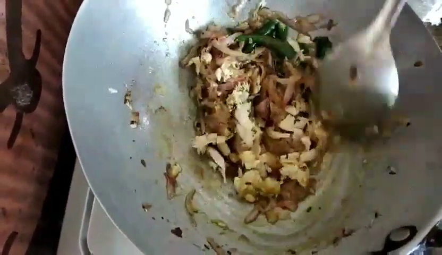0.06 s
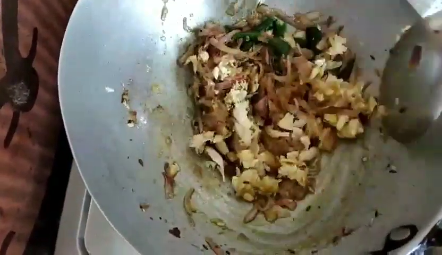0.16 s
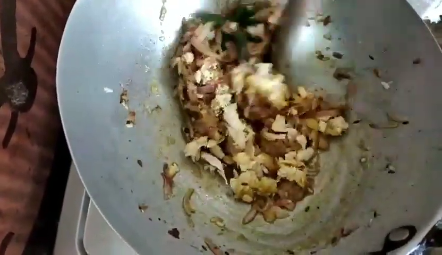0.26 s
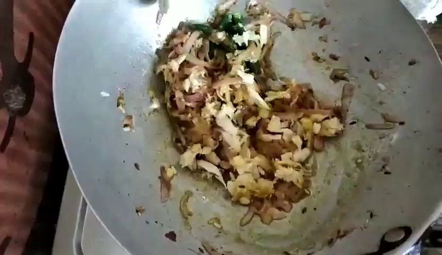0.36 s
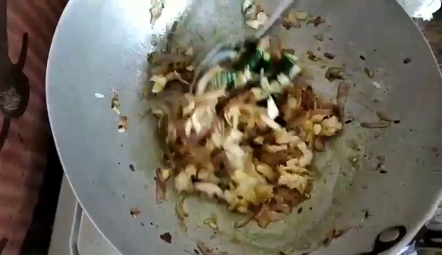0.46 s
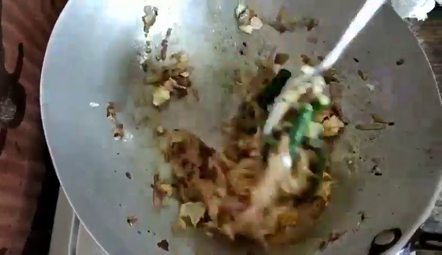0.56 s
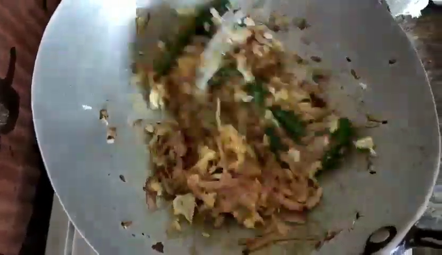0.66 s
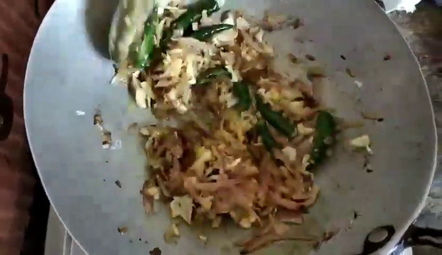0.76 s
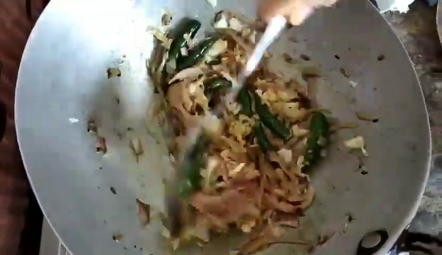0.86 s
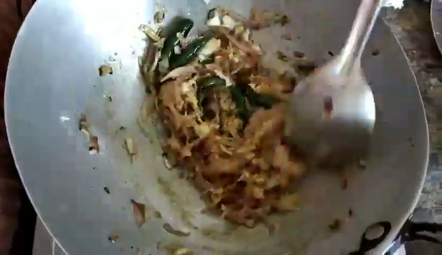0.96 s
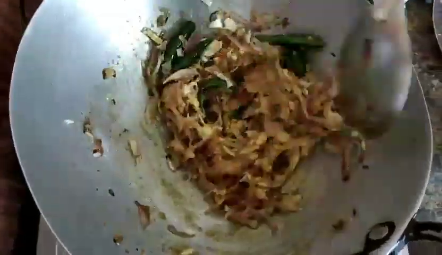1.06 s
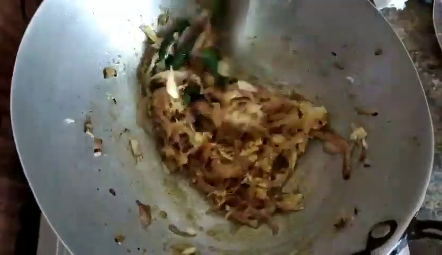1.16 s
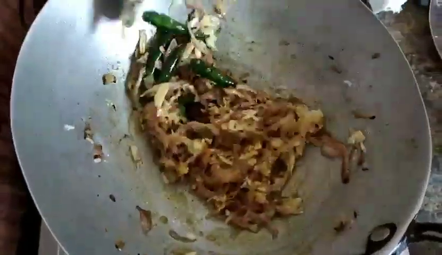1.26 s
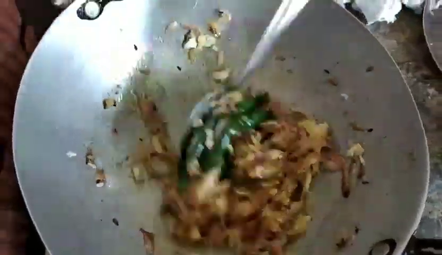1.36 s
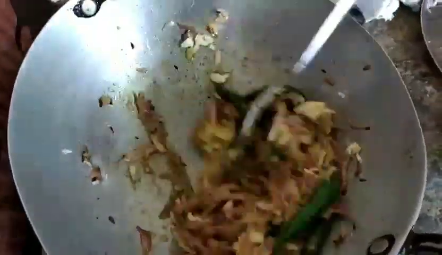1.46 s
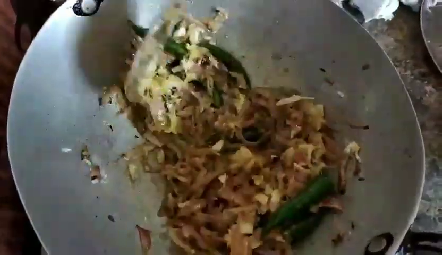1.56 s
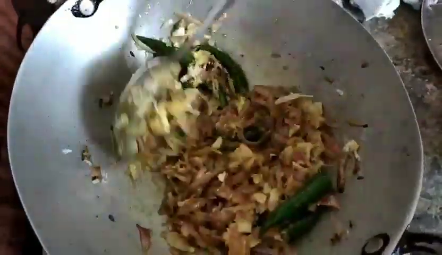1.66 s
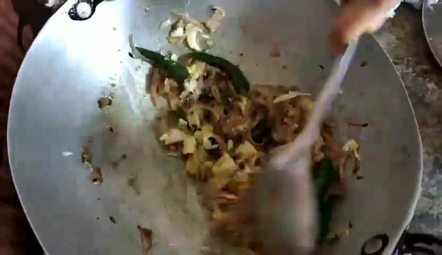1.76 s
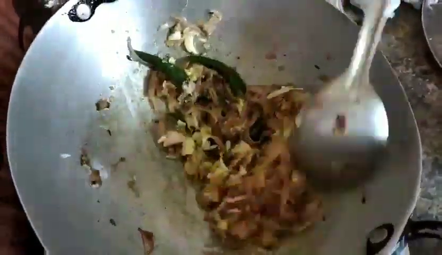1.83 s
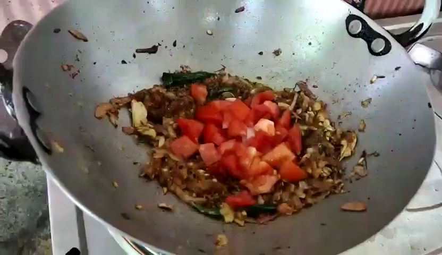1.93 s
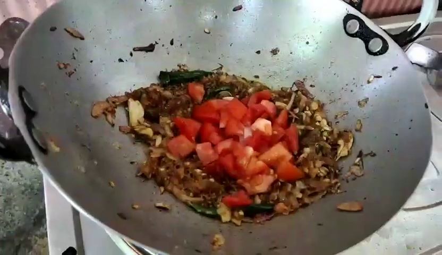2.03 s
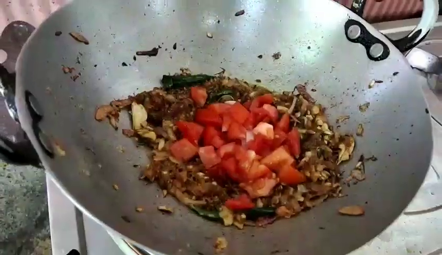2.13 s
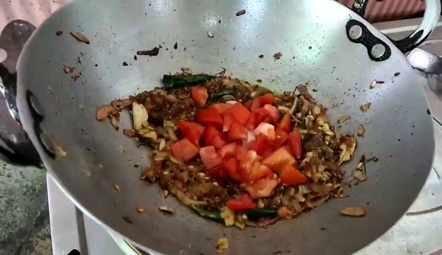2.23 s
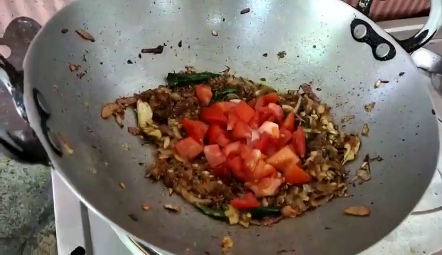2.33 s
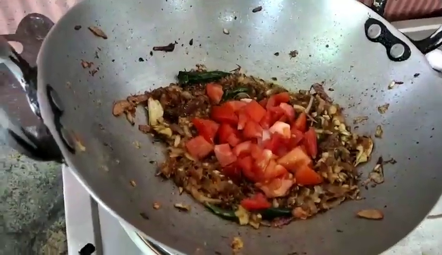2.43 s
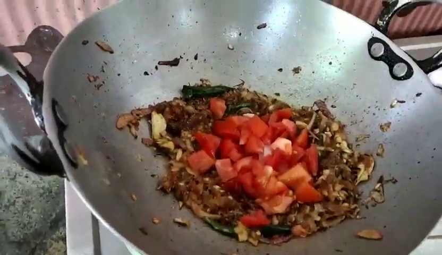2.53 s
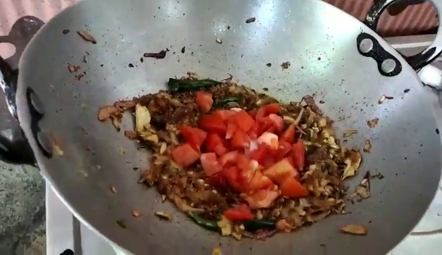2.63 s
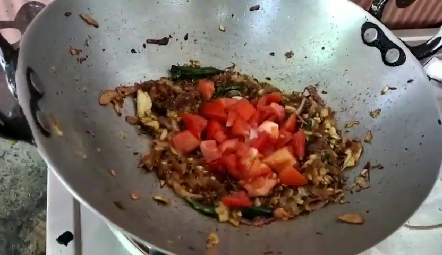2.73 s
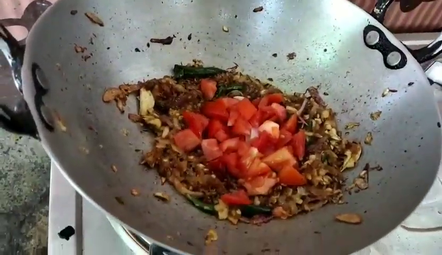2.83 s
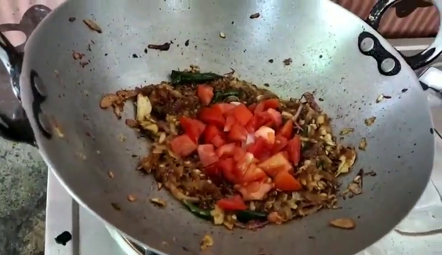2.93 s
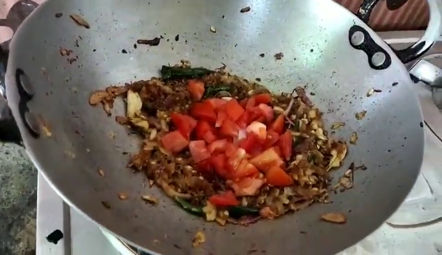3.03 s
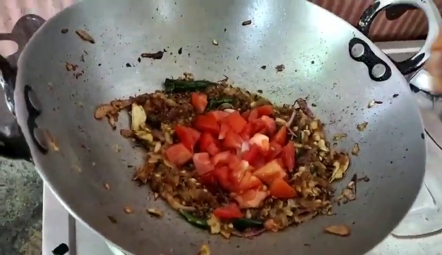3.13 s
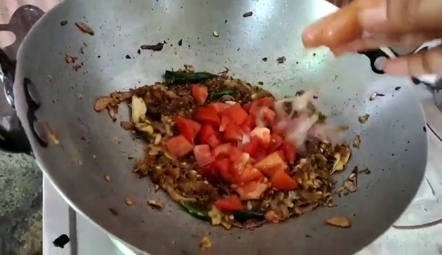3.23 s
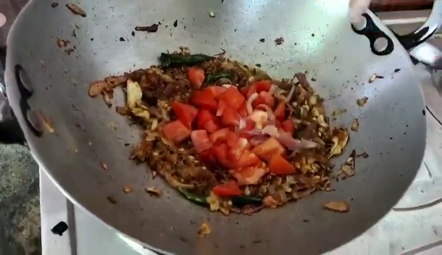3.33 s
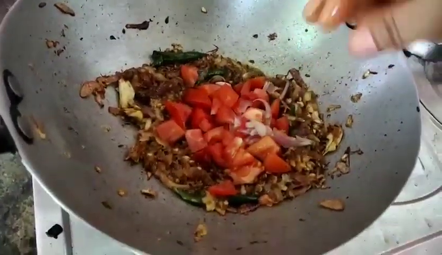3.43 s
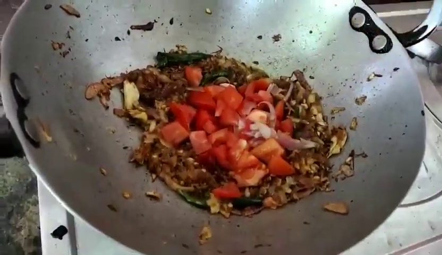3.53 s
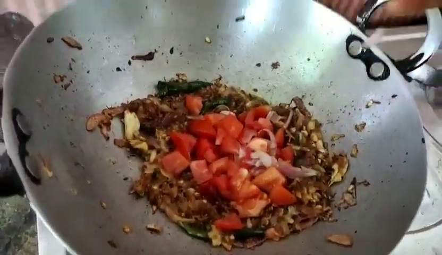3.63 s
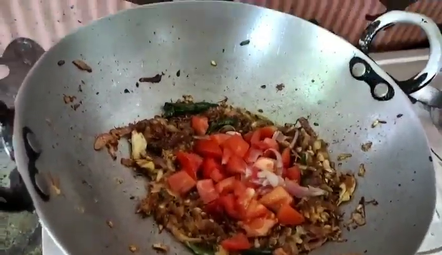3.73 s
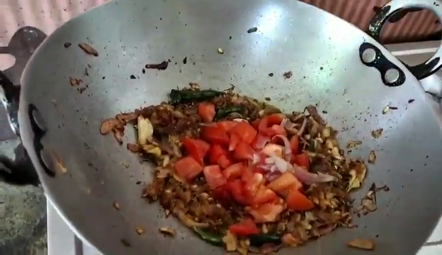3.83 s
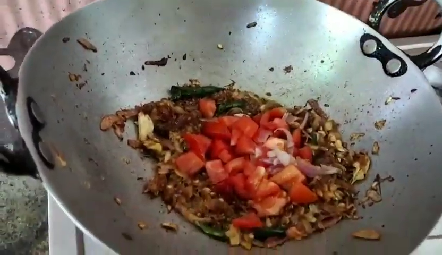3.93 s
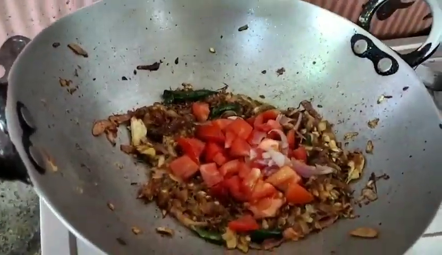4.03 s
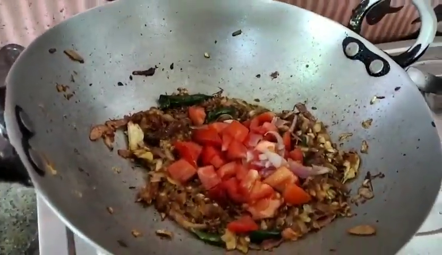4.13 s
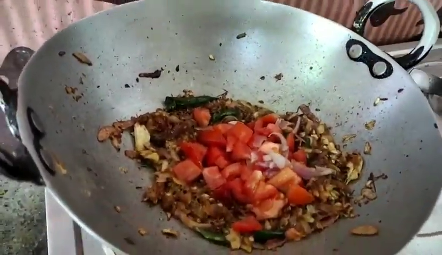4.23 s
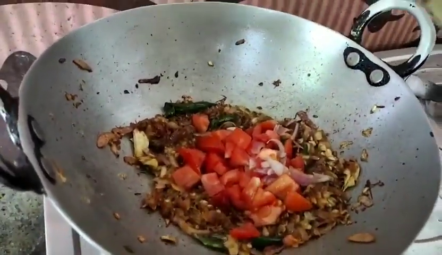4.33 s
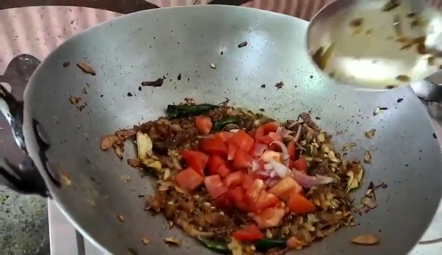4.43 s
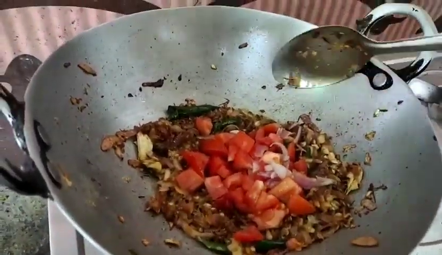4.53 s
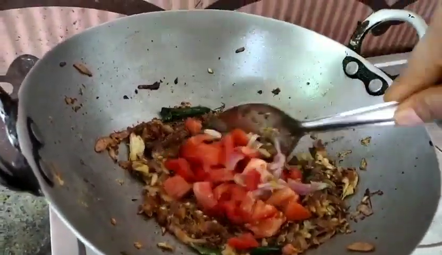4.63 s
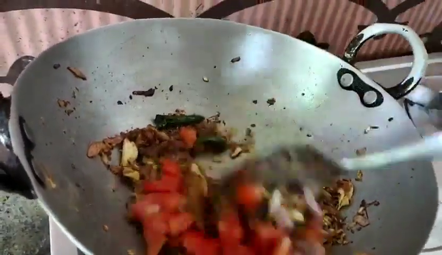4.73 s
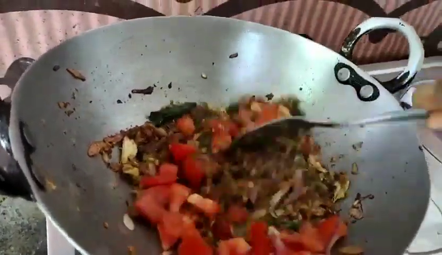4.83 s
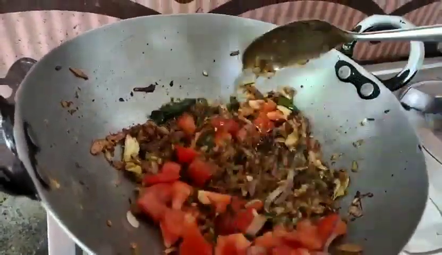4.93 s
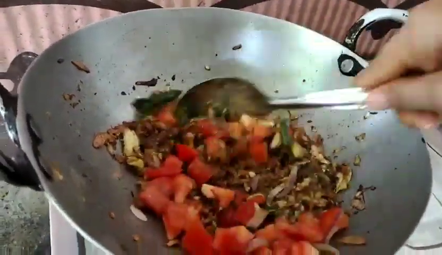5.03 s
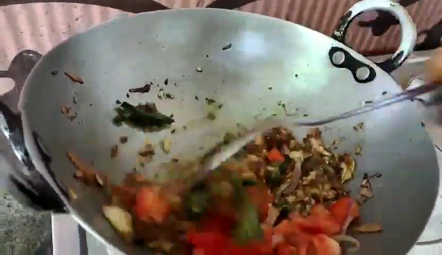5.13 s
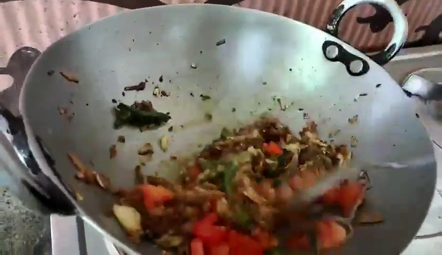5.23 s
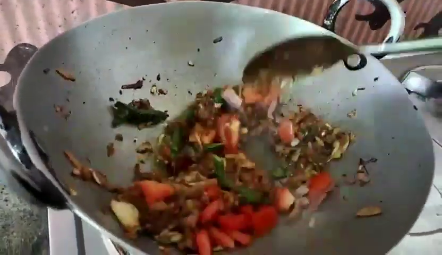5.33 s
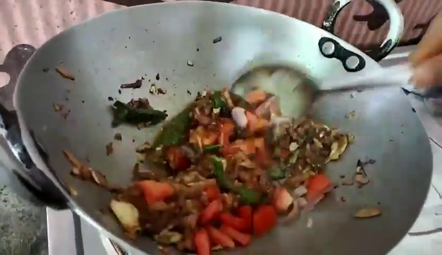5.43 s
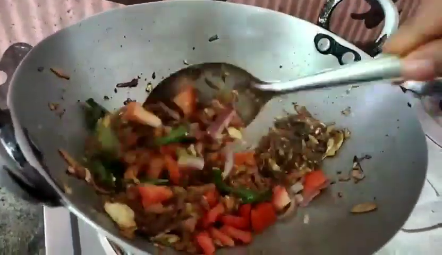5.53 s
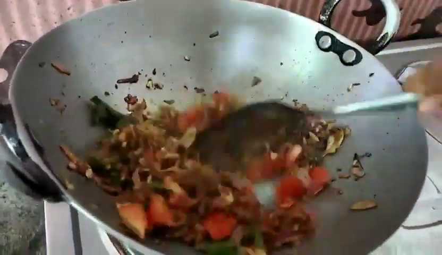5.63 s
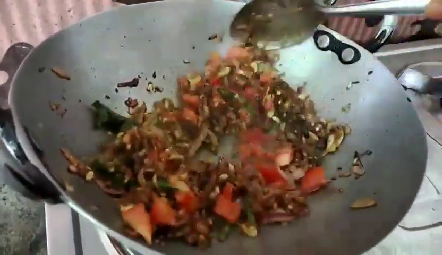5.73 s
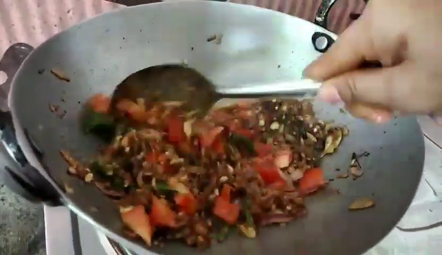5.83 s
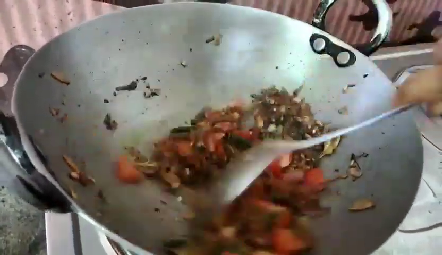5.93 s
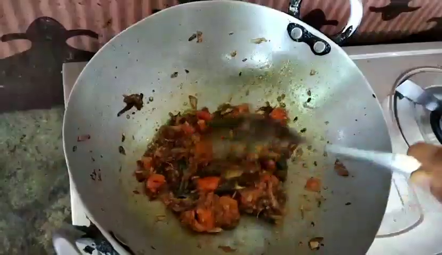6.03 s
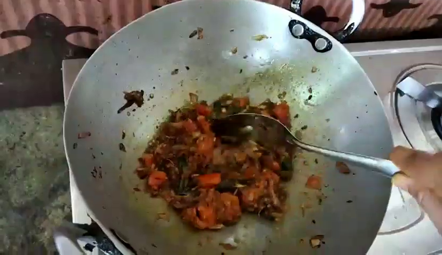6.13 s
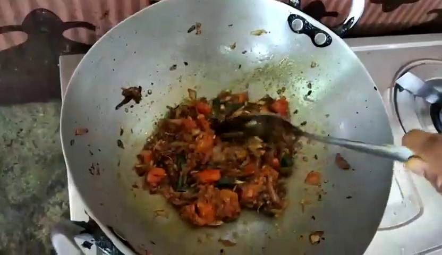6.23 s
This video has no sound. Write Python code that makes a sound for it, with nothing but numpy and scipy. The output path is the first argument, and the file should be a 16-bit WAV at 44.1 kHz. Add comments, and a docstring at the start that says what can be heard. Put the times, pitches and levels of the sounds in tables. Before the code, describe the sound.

Close stereo pickup above a thin metal pan on a gas flame. Vegetables sizzle steadily while a steel spoon knocks, scrapes and pushes them, with a few loud oil cracks. The sound cuts out briefly, then fades into quieter frying full of separate spits. The sizzle grows, the spoon returns, and a fierce wet hiss swells before another short cut and a softer sizzle from one side.

```python
"""Spiced vegetables fry in oil in a thin round pan: steam bubbles burst as dense coloured clicks, single spits as cracks.
A steel spoon knocks on the bowl (decaying low modes), scrapes its wall (stick-slip squeal and rasp) and pushes food.
Below lie a gas flame's filtered-noise roar and a fitful rumble. Two ports close above the pan hear it all.
The sound breaks off twice and fades in again, the last time from another side of the pan."""
import sys
import numpy as np
from scipy import signal
from scipy.fft import rfft, irfft
from scipy.io import wavfile
from scipy.ndimage import uniform_filter1d

SR = 44100
rng = np.random.default_rng(int(sys.argv[2]) if len(sys.argv) > 2 else 0)


def store_wav(level_fs):
    """Save 16-bit WAV to argv[1]."""
    pcm = np.round(np.clip(np.atleast_2d(level_fs), -1, 1) * 32767)
    wavfile.write(sys.argv[1], SR, pcm.T.astype(np.int16))


N = 276948
T = np.arange(N) / SR
LAG_S = 0.0002533  # the right port is nearer the pan


def undb(db):
    """Decibels to an amplitude factor."""
    return 10 ** (np.asarray(db) / 20)


def unit(x):
    """Scale to an rms of 1."""
    return x / np.sqrt(np.mean(x ** 2))


def colour(x, table, share=1):
    """Causal filter from (freq_hz, level_db) points, by way of the cepstrum; share scales the dB."""
    hz, db = np.transpose(table)
    size = 4096
    bin_hz = np.arange(size // 2 + 1) * SR / size
    log_gain = np.log(10) / 20 * np.interp(np.log(bin_hz + 1), np.log(hz), db)
    cepstrum = irfft(share * log_gain)
    cepstrum[1:size // 2] *= 2  # folded onto positive time: minimum phase
    cepstrum[size // 2 + 1:] = 0
    response = irfft(np.exp(rfft(cepstrum)))[:size // 2]
    return signal.fftconvolve(x, response)[:len(x)]


def band(x, hz, width_hz):
    """One resonance, gain 1 at its centre."""
    return signal.lfilter(*signal.iirpeak(hz, hz / width_hz, SR), x)


def two_bands(x, hz, width_hz, wider):
    """Two resonances in a row at one pitch, the second `wider` times as wide."""
    return band(band(x, hz, width_hz), hz, wider * width_hz)


def walk(rate):
    """Random levels held 1 / rate s and slewed twice; spread about 0.6."""
    k = int(SR / rate)
    held = np.repeat(rng.standard_normal(N // k + 1), k)
    return 0.794 * uniform_filter1d(uniform_filter1d(held, k), k)[:N]


def clicks(n, spread_db, most=5.76):
    """A tiny burst at every sample; sizes have a long tail, so a few stand out."""
    size = np.minimum(rng.exponential(size=n), most)
    return unit(rng.standard_normal(n) * undb(spread_db * size))


def pair(common, left, right, alike):
    """Two ports: a shared part plus one of their own; below 0.9 alike the shared part is late at the left."""
    late = np.interp(T - LAG_S, T, common) if alike < .9 else common
    a = np.clip(alike, 0, 1)
    return np.array([np.sqrt(a) * late + np.sqrt(1 - a) * left, np.sqrt(a) * common + np.sqrt(1 - a) * right])


def add(track, s, sound):
    """Mix a sound into the track from s seconds on."""
    i = int(s * SR)
    track[..., i:i + sound.shape[-1]] += sound[..., :N - i]


def stretch_index():
    """Which stretch each sample lies in: 0 first, 1 middle, 2 last."""
    return np.searchsorted([returns_s for _, returns_s, _ in BREAKS], T)


# how fiercely the food fries: time_s, sizzle_db
FRY = [(0.08, -32.5), (0.3, -31), (0.47, -28), (0.55, -33.5), (0.72, -28), (0.87, -27), (1.15, -32),
       (1.35, -29), (1.42, -35.5), (1.52, -31.5), (1.6, -30.5), (1.66, -27.5), (1.74, -31.5), (1.9, -31.5),
       (2.1, -39.5), (2.17, -40), (2.24, -37.5), (2.37, -40), (2.44, -38), (2.52, -39.5), (2.63, -38),
       (2.72, -41), (2.83, -39), (2.9, -44), (2.95, -37), (3.02, -40.5), (3.2, -40.5), (3.25, -37.5),
       (3.32, -36), (3.36, -43.5), (3.42, -37), (3.47, -36.5), (3.52, -30), (3.75, -25.5), (3.88, -28),
       (4.02, -28), (4.07, -31), (4.4, -35), (4.73, -36), (4.755, -29), (4.77, -23.5), (4.82, -20),
       (4.9, -16.5), (5.25, -18.5), (5.45, -16.5), (5.58, -19.5), (5.75, -15.5), (5.96, -17.5), (6.19, -30),
       (6.25, -30)]


def sizzle_level(t):
    """Level of the sizzle in dB: how fierce the frying is, sliding from point to point."""
    return np.interp(t, *np.transpose(FRY))


# small bubbles by size: pitch_hz, width_hz (first of two passes), level_db (balance between sizes)
CRACKLE = [(1307, 700, -25.5), (2920, 1230, -14.5), (4670, 1760, -8), (7960, 1170, -1.5),
           (10640, 2300, -10)]


def crackle(per_s=220):
    """Small single pops at random moments; each bubble size rings at its own pitch."""
    out = 0
    for hz, width_hz, db in CRACKLE:
        size = np.minimum(rng.exponential(size=N), 2.2)
        pops = (rng.random(N) < per_s / SR) * undb(1.7 * size)
        heard = np.array([np.interp(T - LAG_S, T, pops), pops]) * rng.standard_normal((2, N))
        out = out + undb(db) * two_bands(heard, hz, width_hz, 2)
    return unit(out)


# tone of the fine sizzle in the first, middle and last stretch: freq_hz, level_db (relative, per Hz)
SIZZLE_FIRST = [(530, -56.5), (900, -20), (1250, -8.5), (1600, -14), (1790, -6), (1990, -12.5),
                (2730, -7.5), (5160, -7), (7680, 1), (9310, -7), (14700, -11.5), (15400, -22.5),
                (16000, -29.5)]
SIZZLE_MIDDLE = [(880, -41), (1500, -28.5), (1620, -19.5), (1900, -22), (2250, -16.5), (2600, -16),
                 (3120, -10.5), (3770, -13.5), (5830, -7), (6430, -1.5), (7540, 0.5), (10900, -11),
                 (12400, -9), (14800, -13.5), (15500, -19.5), (16000, -15)]
SIZZLE_ASIDE = [(880, -56), (1500, -25.5), (2590, -10), (2970, -8.5), (5380, 0), (6690, -1.5),
                (10200, -0.5), (15100, -19), (16000, -31.5)]
# tone of the larger wet bubbles: freq_hz, level_db (relative, per Hz)
BUBBLING = [(210, -38), (350, -12), (484, -15.5), (584, -9), (712, -7), (852, -4), (975, -5.5), (1380, -1),
            (1770, -7), (2200, -4), (3000, -5), (3900, -13), (6600, -120)]
WET_DB, WET_FOLLOWS = -42, 0.681  # wet bubbling at a sizzle of -28 dB, and dB it gains per dB of sizzle


def frying():
    """Fine bursts come in flurries and make the sizzle; larger wet bubbles sound lower."""
    sizzle_db = sizzle_level(T)
    sparse = np.interp(sizzle_db, [-40, -18], [1.4, .7])  # fierce frying blends into an even hiss
    flurry = undb(sparse * (0.85 * walk(60) + 1.814 * walk(250) + 0.64 * walk(900)))
    bursts = pair(*(clicks(N, 1.39) for _ in range(3)), alike=0.081) * flurry
    stretch = stretch_index()
    tones = SIZZLE_FIRST, SIZZLE_MIDDLE, SIZZLE_ASIDE
    fine = np.array([np.choose(stretch, [unit(colour(port, tone)) for tone in tones]) for port in bursts])
    wet = pair(*(clicks(N, 3.91) for _ in range(3)), alike=0.673) * flurry ** 2.25
    wet = unit(np.array([colour(port, BUBBLING) for port in wet]))
    wet_db = WET_DB + WET_FOLLOWS * (sizzle_db + 28.0)
    return undb(sizzle_db) * (fine + 0.372 * sparse * crackle()) + undb(wet_db) * wet


# small spits at random moments, also while the spoon works: from_s, to_s, crack_peak_over_sizzle_db,
# peak_scatter_db, pan_db (left minus right, before the far-port factor), pan_scatter_db
SMALL_SPITS_SPAN = (1.3042, 5.5, 13, 2.0, -1, 2.5)
SMALL_SPITS_COUNT = 160
SPIT_HZ, SPIT_SCATTER_HZ = 7474, 610
SPRAY_DB, SPRAY_SCATTER_DB = -19, 7  # spray against the crack


def small_spits():
    """Rows like SPITS at random moments, as strong as the frying then is."""
    start, stop, over_db, scatter_db, pan_db, pan_scatter_db = SMALL_SPITS_SPAN
    s = start + (stop - start) * rng.random(SMALL_SPITS_COUNT)
    z = np.clip(rng.standard_normal((4, SMALL_SPITS_COUNT)), -2, 2)
    peak_db = sizzle_level(s) + over_db + scatter_db * z[0]
    pans_db = pan_db + pan_scatter_db * z[1]
    return list(zip(s, peak_db, pans_db, SPIT_HZ + SPIT_SCATTER_HZ * z[2], SPRAY_DB + SPRAY_SCATTER_DB * z[3]))


# single spits of water in oil, faint to loud, at set times: time_s, crack_peak_db (nearer port),
# pan_db (left minus right, before the far-port factor), pitch_hz, spray_db (against the crack)
SPITS = [(0.1792, -21, -0.5, 7840, -13.5), (0.2086, -20, 4, 6620, -15.5), (0.3757, -20, -4.5, 7810, -19),
         (0.7693, -10, 3.5, 7240, -14), (0.8299, -12, 0.5, 7360, -11), (1.0829, -3.5, 4, 6800, -9.5),
         (1.1809, -6.5, -2, 7590, -25), (1.2762, -9.5, 3.5, 7500, -19.5), (1.457, -22.5, 1, 7490, -16),
         (1.6958, -10, -0.5, 7050, -12), (1.9701, -45, -6, 6970, -18), (1.99, -31.5, -10, 7690, -16.5),
         (2.026, -31.5, -9, 7770, -16.5), (2.0614, -24, -5.5, 7700, -15), (2.1078, -22.5, -7.5, 6900, -7),
         (2.1318, -23.5, -8.5, 7710, -7), (2.1936, -30.5, -1, 7490, -16.5), (2.2227, -24, -7, 7720, -15),
         (2.2345, -14.5, -4.5, 7400, -10.5), (2.2791, -17, -10.5, 7510, -15),
         (2.3015, -22, -3.5, 7810, -17), (2.3188, -24, -2, 7960, -15), (2.434, -19, -5, 6270, -8.5),
         (2.5025, -20.5, -4, 6720, -14), (2.5465, -10.5, -2.5, 7670, -21), (2.5638, -16, -6, 6840, -19),
         (2.6208, -13.5, -3, 7030, -24.5), (2.6541, -17, -8, 7350, -11.5), (2.735, -29.5, -2, 7890, -20),
         (2.7478, -14.5, -0.5, 7760, -17), (2.7814, -21.5, -2.5, 6760, -12), (2.8112, -16, 2, 8890, -12),
         (2.8331, -15, -0.5, 8050, -11), (2.877, -27, -4, 7260, -15), (2.9229, -21, -8, 7830, -14),
         (2.9665, -11.5, -19, 6330, -17), (3.014, -29, -6.5, 7710, -19), (3.0402, -18.5, 1, 7700, -15.5),
         (3.1336, -17.5, -2.5, 7040, -20.5), (3.1788, -21, -1, 7980, -13.5), (3.2018, -33, -1.5, 7900, -18),
         (3.2267, -9.5, -6.5, 7150, -16), (3.3844, -18.5, 0, 7700, -8.5),
         (3.4216, -17.5, -4.5, 6550, -10.5), (3.4808, -14.5, -1.5, 8000, -14),
         (3.5212, -18.5, -6.5, 7920, -14.5), (3.6213, -5.5, 2, 6580, -27), (3.7582, -1.5, -0.5, 8160, -16),
         (4.1005, -15.5, -5.5, 6460, -11), (4.3214, -6.5, 0.5, 6000, -15), (4.4289, -19.5, -5, 6400, -11.5),
         (4.4545, -10.5, -2, 7660, -13.5), (4.5466, -18, -1.5, 6960, -9), (4.5952, -11, -4, 6500, -10.5),
         (4.6415, -30.5, -2, 7880, -18.5), (2.2032, -17.5, -6, 7560, -16.5),
         (2.2454, -19.5, -9.5, 7780, -13), (2.334, -21.5, -3, 7980, -12), (2.4008, -26.5, -11, 6280, -16),
         (2.4468, -17.5, -7, 7960, -14), (2.595, -20, -5.5, 8030, -17.5), (2.61, -26, -8, 6930, -18.5),
         (2.8385, -19, 1, 7580, -15), (2.9363, -20, -1.5, 7850, -16), (2.9443, -20.5, -4, 7680, -19),
         (3.1507, -28.5, 0.5, 7010, -16), (3.2414, -22.5, -8.5, 7910, -15.5),
         (3.255, -18.5, -7.5, 7390, -14.5), (3.2922, -19, -11, 7290, -15), (3.3107, -14, -7, 6790, -14.5),
         (3.3184, -19.5, -6.5, 6700, -8.5), (3.4114, -20.5, -0.5, 7300, -12),
         (3.6657, -18, -4, 7980, -15.5), (3.7994, -20, -1, 7710, -16.5), (3.8526, -7, -2, 7300, -15),
         (3.9052, -11, -2, 7910, -17), (3.9774, -19, -3.5, 8200, -15.5), (3.9953, -12, -4, 8240, -11),
         (4.0144, -8.5, -7, 8310, -16), (4.1275, -11, -0.5, 7180, -15.5), (4.1861, -20.5, -8, 7640, -15.5),
         (4.2351, -10.5, -3.5, 7800, -22), (4.2469, -16, -1, 7290, -17.5), (4.2864, -16, 2.5, 8750, -18),
         (4.4803, -16, -3, 6650, -11), (6.1867, -19.5, 7, 7900, -13)]
SPIT_WIDTH_HZ = 2910


def spit_ring(burst, hz):
    """A burst rings at the spit's pitch, with weaker fixed resonances around it."""
    ring = two_bands(burst, hz, SPIT_WIDTH_HZ, 3)
    ring = ring + 0.287 * band(band(burst, 14030, 7800), 11200, 9000)
    return ring + 0.064 * band(burst, 1400, 1700) + 0.165 * band(burst, 5800, 2500) + 0.079 * band(burst, 3200, 1800)


def spits():
    """A crack inside a few milliseconds of spray; the far port hears it late and more smeared."""
    out = np.zeros((2, N))
    t = T[:900] - T[200]  # the crack starts at 0, the spray swells before it
    for s, db, pan_db, hz, spray_db in SPITS + small_spits():
        pop = rng.standard_normal(len(t))
        for port, side in enumerate((1, -1)):
            far_db = max(-side * pan_db, 0)
            snap = (t >= 0) * np.exp(-np.abs(t) / (0.00016 + .00001 * far_db))
            swell = np.exp(-np.abs(t) / np.where(t < 0, .0008, .0035))
            crack = spit_ring((pop + 0.213 * rng.standard_normal(len(t))) * snap, hz)
            crack = crack / np.abs(crack).max()
            spray = unit(spit_ring(clicks(len(t), 6.15), hz)) * swell * undb(spray_db)
            start = s - T[145] + .00004 * far_db + LAG_S * (1 - port)
            add(out[port], start, undb(db - 0.82 * far_db) * (crack + spray))
    return out


# spoon knocks: time_s (sounds from 4 ms before), level_db, bowl_pitch_hz, ring_t60_s (held within 0.05-1)
KNOCKS = [(.047, -47.5, 270, 0.147), (.06, -36.5, 268.7, .15), (0.071, -33.5, 290, 0.35),
          (.083, -38, 290, 0.43), (.166, -43, 303, 0.42), (0.343, -49.5, 276.4, 0.83),
          (0.377, -43.5, 300.8, 0.44), (0.522, -44, 261.7, 0.41), (0.621, -40.5, 288, 0.3),
          (0.766, -47.5, 261.6, 0.36), (0.835, -32, 264.8, 0.186), (.841, -33.5, 284.9, 0.23),
          (.852, -34, 280.2, 0.29), (0.991, -31.5, 295, 0.125), (1.0, -32.5, 328.1, 0.097),
          (1.009, -34, 274.5, 0.548), (1.279, -37.5, 239, 0.33), (1.295, -42, 255, 0.2),
          (1.309, -37.5, 252.5, 0.486), (1.466, -39.5, 330.6, 0.114), (1.692, -37.5, 245.2, 0.11),
          (1.7, -35, 283.3, 0.136), (1.707, -33, 331, 0.123), (1.722, -39, 265.8, 0.296),
          (1.836, -33.5, 266.9, 0.186), (1.846, -34, 287.9, .2), (1.862, -34, 290, 0.25),
          (1.893, -46.5, 289.7, 0.51), (3.98, -41, 316.3, 0.083), (4.398, -40, 282.5, 0.204),
          (4.552, -41.5, 302.1, 0.5), (4.695, -40, 265.8, 0.57), (4.821, -33.5, 270, 0.2),
          (4.831, -28.5, 266, 0.152), (4.844, -32, 270, 0.087), (4.872, -34, 260, 0.11),
          (4.91, -42, 302.8, 0.18), (4.988, -33, 250, 0.332), (5.177, -41.5, 258.6, 0.28),
          (5.193, -39, 268.4, 0.39), (5.207, -42, 282.7, 0.57), (5.378, -42.5, 289, 0.97),
          (5.48, -33, 270.3, 0.265), (5.64, -37.5, 293.5, 0.29), (5.682, -29, 272.6, 0.232),
          (5.81, -43, 230.5, 0.47), (5.973, -36, 304, 0.068), (6.16, -36.5, 291.1, 0.153)]
CRACK_DRY_DB, CRACK_WET_DB = 1.5, -3  # dry food before the first break, juicy food after it
ROCKING_S, ROCKING_DB = .022, -7  # a knock that soon after another is the bowl rocking on: less crack
THUD_T60_S, HUM_DB = 0.0582, -3  # a knock first dies fast, then the bowl hums on this much lower
# the bowl's next mode has a decay of its own on top of the bowl's
OVERTONE_RATIO, OVERTONE_DB, OVERTONE_T60_S = 1.53, -7, 0.1025


def knocks():
    """The spoon lands and bounces; the bowl answers with a close pair of low modes; the contact cracks, then rattles."""
    out, t = np.zeros(N), T[:SR // 3]
    for (s, db, hz, t60), before in zip(KNOCKS, [(-1,)] + KNOCKS):
        crack_db = CRACK_DRY_DB if s < BREAKS[0][0] else CRACK_WET_DB
        crack_db += ROCKING_DB * (s - before[0] < ROCKING_S)
        noise, bounce = rng.standard_normal((2, len(t))), rng.random((3, 2))
        blows = np.zeros(SR // 20)
        blows[0] = 1
        blows[(SR * (.006 + .035 * bounce[:, 0])).astype(int)] = 0.12 * bounce[:, 1]
        chatter = unit(band(band(noise[0], hz, 130), hz, 210))
        # the lower mode takes its phase from the time of the knock
        ring = np.sin(2 * np.pi * hz * (t + s)) + 0.372 * np.sin(2 * np.pi * 1.18 * hz * t) + 0.429 * chatter
        overtone = unit(band(noise[0], OVERTONE_RATIO * hz, 160)) * 1000. ** (-t / OVERTONE_T60_S)
        ring += undb(OVERTONE_DB) * overtone
        thud = 1000. ** (-t / THUD_T60_S)
        hum = undb(HUM_DB) * 1000. ** (-t / np.clip(t60, .05, 1))
        ring *= (1 - np.exp(-t / 0.00328)) * (thud + hum)
        snap, rattle = np.exp(-t / .0015), 0.513 * np.exp(-t / 0.046)
        crack = unit(band(band(noise[1], 810, 2000), 1050, 4000)) * (snap + rattle) * undb(crack_db)
        add(out, s - .004, undb(db) * signal.fftconvolve(ring + crack, blows))
    return pair(out, out, out, alike=0.91)


# spoon edge dragged on the wall: start_s, length_s, level_db (of the squeal with its tone),
# contact_pitch_hz (mid-stroke), glide_octaves (over the stroke), tone_db (steady tone over rough squeal),
# rasp_db (over squeal), bite_share (of the stroke before full pressure, held within 0.02-0.9)
SCRAPES = [(.004, 0.017, -35.5, 1255, -0.0073, 6.5, -1, 0.25),
           (0, 0.056, -40.5, 997, -0.156, -15.5, 5.5, 0), (0, 0.05, -37.5, 677, -0.49, -4, 2.5, 0),
           (0, 0.0395, -39.5, 1900, -.15, -12.5, 13, 0.08),
           (.004, 0.0695, -43.5, 2810, 0.13, -6.5, 15.5, 0.43),
           (.067, 0.0129, -42, 1308, -.3, -15, 3.5, .1), (0.155, 0.0085, -52, 1250, 0, -17, -5, 0.28),
           (0.176, 0.0104, -46, 2695, -0.072, -7.5, 7, 0.12),
           (.2085, 0.00516, -36, 1658, -0.34, 0, 0.5, 0.2), (0.377, 0.0077, -49, 3820, 0.096, -14, 4, 0.17),
           (0.827, 0.0087, -41, 1208, -.3, -17.5, 7.5, 0.17),
           (0.844, 0.03, -41.5, 1210, -0.083, -10.5, 8.5, 0), (0.902, 0.014, -43, 1204, 0.16, -9, -2.5, .5),
           (.914, .022, -30, 1341, 0.14, 5, -0.5, 0.63), (.915, 0.0234, -39, 724.6, 0.25, 5, -8.5, 0.89),
           (.916, 0.0144, -39.5, 1935, -0.14, -13.5, -2, .3),
           (0.934, 0.0363, -33, 1379, -0.364, 0, 7, 0.25),
           (0.985, 0.0084, -43.5, 1179, -0.39, -15, -5.5, 0.13),
           (1.079, 0.0136, -38, 2748, -0.098, -10, 11.5, 0.33),
           (1.094, 0.0184, -38, 2765, -0.089, -8.5, 12, 0), (1.101, 0.0333, -31.5, 2450, -.2, 2, 9, 0.59),
           (1.122, 0.0338, -31, 1408, 0.062, 4, 4, 0.37),
           (1.127, 0.028, -39.5, 2640, 0.064, -11.5, 1.5, 0.2),
           (1.266, 0.044, -42.5, 2000, -.05, 5.5, -5.5, 0.09),
           (1.263, 0.0233, -44, 4220, .05, -2.5, -3.5, 0.26),
           (1.272, 0.0104, -53.5, 1276, -0.019, -13, -6, 0.28),
           (1.454, 0.0146, -44.5, 1230, -0.263, -6.5, 0.5, 0.19),
           (1.696, 0.00433, -42.5, 1294, -0.39, -14, -1.5, 0.28),
           (1.699, 0.0127, -44.5, 1402, -0.245, -11, 1.5, 0.16),
           (1.77, 0.0095, -36.5, 1229, -0.14, -3, -1.5, 0),
           (1.776, 0.0195, -38, 1301, 0.136, 3.5, 6.5, .35),
           (1.792, 0.0147, -38.5, 1371, -0.056, -10, 7.5, 0.32),
           (1.798, 0.0308, -30, 1323, -0.298, 7.5, 2.5, 0.37),
           (1.826, 0.0163, -40.5, 1504, -0.21, -15, 8, 0.06),
           (1.878, 0.0097, -46.5, 1280, 0.092, -9.5, -9, 0.2),
           (3.751, 0.0236, -47.5, 1383, 0.065, -12.5, -8.5, 0.16),
           (3.796, 0.014, -49.5, 1227, -0.144, -14.5, -7.5, 0.08),
           (3.852, 0.0067, -51, 1274, 0, -16, -8.5, 0.15),
           (4.544, 0.0127, -50.5, 1970, 0.0072, -15.5, 3, 0.08),
           (4.691, 0.0133, -46.5, 791, -0.33, -15.5, -6, 0.02),
           (4.805, 0.0114, -47.5, 1390, 0.016, -16, -9, 0),
           (5.013, 0.021, -44.5, 1453, -0.058, -12, -8.5, 0.15),
           (5.055, 0.013, -47.5, 1190, 0, -14.5, -9, 0.28),
           (5.123, 0.017, -42, 1253, -0.037, -12.5, -10, 0.34),
           (5.154, 0.026, -38, 1413, 0.076, 4, -10.5, 0.31),
           (5.176, 0.0124, -39, 1354, -0.00063, -9.5, -10, 0.49),
           (5.194, 0.0154, -44, 1396, 0.03, -12, -8.5, 0.16),
           (5.287, 0.0097, -48.5, 1004, 0.21, -17, -9, .15),
           (5.389, 0.024, -49, 733, -0.043, -6.5, -8, 0.35),
           (5.454, 0.0495, -36.5, 1388, -0.056, -11.5, -10, 0.3),
           (5.565, 0.0135, -49.5, 1104, 0.057, -12.5, -9, 0.2),
           (5.637, 0.0166, -38.5, 1299, 0.022, -8.5, -10, 0),
           (5.866, 0.0079, -36.5, 2560, -0.1, -7.5, 7, 0.1),
           (5.936, 0.0426, -37, 946.6, -0.237, 0, -6, 0.64),
           (5.939, 0.053, -39, 1242, -0.091, -9.5, -5.5, 0),
           (5.943, 0.041, -38.5, 1744, -.1, -9.5, -6.5, 0.6),
           (5.955, 0.0535, -42.5, 701.4, -0.158, 0.5, -8.5, 0.23)]
# modes of the pan wall: pitch_hz, width_hz (before smear and the second pass), level_db (before the fall with pitch)
WALL = [(730.7, 155, -2), (915, 280, -5), (1416, 412, 8), (1805, 265, 10.5), (2550, 240, 7),
        (2630, 350, -14.5), (4310, 270, -11)]
# rasp of the spoon edge: pitch_hz, width_hz (first of two passes), level_db (balance between bands)
RASP = [(6884, 780, 0.5), (7576, 1816, 8.5), (9600, 4800, -5), (4006, 2090, -2.5)]
WALL_DB_PER_OCTAVE = 10  # modes far from the contact pitch are weaker
SMEAR_CYCLES = 1.45  # short strokes ring broadly: this over the length in s widens every wall mode in Hz
SQUEAL_WIDTH_HZ, WALL_UNDER_SQUEAL_DB = 236, -1  # squeal width before smear
SCRAPE_PAN_DB = 3  # left minus right


def scrapes():
    """Stick-slip clicks squeal at the moving contact, ring the wall and rasp the edge; pressure bites, then eases."""
    out = np.zeros((3, N))
    for s, length, db, hz, glide, tone_db, rasp_db, bite in SCRAPES:
        n = int(length * SR)
        size = n + 800  # room to ring out
        along = np.arange(size) / n
        press = np.interp(along, [0, np.clip(bite, .02, .9), 1], [0, 1, 0.15]) * (along < 1)
        slip = np.array([clicks(size, 2.39) for _ in range(3)]) * press * undb(2.0 * walk(200)[:size])
        smear = SMEAR_CYCLES / length
        wall = 0
        for f, w, d in WALL:
            mode_db = d - WALL_DB_PER_OCTAVE * abs(np.log2(f / hz))
            wall = wall + undb(mode_db) * two_bands(slip[0], f, w + smear, 1.25)
        pitch = hz * 2 ** (glide * (np.minimum(along, 1) - .5)) * (1 + 0.0304 * walk(91.5)[:size])
        turn = np.exp(2j * np.pi * np.cumsum(pitch) / SR)
        grip = signal.butter(2, (SQUEAL_WIDTH_HZ + smear) / 2, fs=SR)  # sets how wide the squeal is
        squeal = unit((signal.lfilter(*grip, slip[0] + 1j * slip[1]) * turn).real)
        scratch = unit(band(slip[0], 1.8 * hz, 3.5 * hz))
        squeal = unit(squeal + undb(WALL_UNDER_SQUEAL_DB) * unit(wall) + 0.47 * scratch)
        tone = unit(press * turn.imag * undb(2.5 * walk(90)[:size]))
        squeal = unit(squeal + undb(tone_db) * tone)
        rasp = unit(sum(undb(d) * two_bands(slip, f, w, 2) for f, w, d in RASP))
        # the root makes up for the ring-out room in the rms
        add(out, s, undb(db) * np.sqrt(1 + 800 / n) * (squeal + undb(rasp_db) * rasp))
    return pair(*out, alike=0.299) * undb(np.array([[.5], [-.5]]) * SCRAPE_PAN_DB)


# spoon pushing food along the wall: time_s, level_db (of the wall's ringing)
STIR = [(0, -37), (.5, -55), (1.0, -46.5), (1.5, -59.5), (1.9, -70.5), (2.0, -48.5), (3.4, -81),
        (3.7, -44.5), (4.3, -50), (4.75, -42.5), (4.85, -42.5), (5.05, -40), (5.3, -37.5), (5.55, -40.5),
        (5.7, -47), (6.0, -33), (6.1, -61)]


def stirring():
    """Food dragged along the wall sets its modes and the bowl trembling, in fits."""
    grit = np.array([clicks(N, 3.93) for _ in range(3)]) * undb(3.65 * walk(30) + 0.97 * walk(130))
    wall = sum(undb(d - 10.37 * np.log2(f / 700)) * two_bands(grit, f, w, 2) for f, w, d in WALL)
    bowl = unit(band(band(grit, 283, 90), 268.5, 140))
    trembling = unit(wall) + 0.209 * bowl
    return undb(np.interp(T, *np.transpose(STIR))) * pair(*trembling, alike=0.91)


# tone of the burner: freq_hz, level_db (relative, per Hz)
FLAME = [(12, -44.5), (20, -20), (64, -3.5), (160, 1), (195, 2), (235, -0.5), (420, -8), (485, -8.5),
         (600, -7.5), (780, -1), (1320, -120)]
FLAME_DB = -54


def flame():
    """The burner's low roar: coloured noise with a wandering level, nearly the same at both ports."""
    roars = (colour(rng.standard_normal(N), FLAME) * undb(0.74 * walk(5.1)) for _ in range(3))
    return undb(FLAME_DB) * unit(pair(*roars, alike=0.989))


# a deep rumble that comes and goes: time_s, level_db
RUMBLE = [(0, -61), (.75, -65), (.84, -59.5), (.9, -71.5), (1.07, -58.5), (1.09, -50), (1.13, -71.5),
          (1.65, -64), (1.7, -58), (1.76, -64), (2.15, -66.5), (2.45, -56), (2.7, -71.5), (5.9, -67),
          (5.96, -50.5), (6.1, -76.5)]
RUMBLE_HZ = 65


def rumble():
    """Low resonant noise, the same at both ports."""
    low = unit(band(band(rng.standard_normal(N), RUMBLE_HZ, 70), RUMBLE_HZ, 130))
    return undb(np.interp(T, *np.transpose(RUMBLE))) * low


def scene():
    """All sources at the two ports, from the frying down to the rumble."""
    return frying() + spits() + knocks() + scrapes() + stirring() + flame() + rumble()


# balance of the ports in the first, middle and last stretch: freq_hz, left_minus_right_db
PORTS_FIRST = [(60, 0.5), (110, -3.5), (200, 1.5), (380, -4.5), (700, 2), (1290, 0), (2380, -0.5),
               (4400, -2), (8120, -0.5), (15000, 2.5)]
PORTS_MIDDLE = [(60, -4), (110, -0.5), (200, -2), (380, 0), (700, -1), (1290, 3.5), (2380, 4), (4400, -5),
                (8120, -3.5), (15000, 7)]
PORTS_ASIDE = [(60, -1), (110, -1.5), (200, 0.5), (380, 1.5), (700, 1), (1290, -1.5), (2380, 7),
               (4400, 9.5), (8120, 5), (15000, 10.5)]
# breaks in the sound: stops_s, returns_s, fade_in_s
BREAKS = [(1.913, 1.956, 0.178), (6, 6.069, 0.206)]
TOP_HZ = 15700


def record(dry):
    """Each port has its own colour; the sound breaks off with a short tail and fades in; peaks round off, the top is cut."""
    stretch = stretch_index()
    balances = PORTS_FIRST, PORTS_MIDDLE, PORTS_ASIDE
    # each port takes half of the difference
    out = np.array([np.choose(stretch, [colour(port, balance, share) for balance in balances])
                    for port, share in zip(dry, (.5, -.5))])
    for stop, back, fade in BREAKS:
        since = np.clip(T - stop, 0, None)
        tail = np.maximum(np.exp(-since / 0.00092), 0.0266 * np.clip(1 - since / 0.0335, 0, 1) ** 2)
        out = out * np.maximum(tail, np.clip((T - back) / fade, 0, 1))
    rounded = np.tanh(1.268 * out) / 1.315
    return signal.sosfilt(signal.ellip(12, .2, 100, TOP_HZ, fs=SR, output="sos"), rounded)


dry = scene()
out = record(dry)
store_wav(out)
```